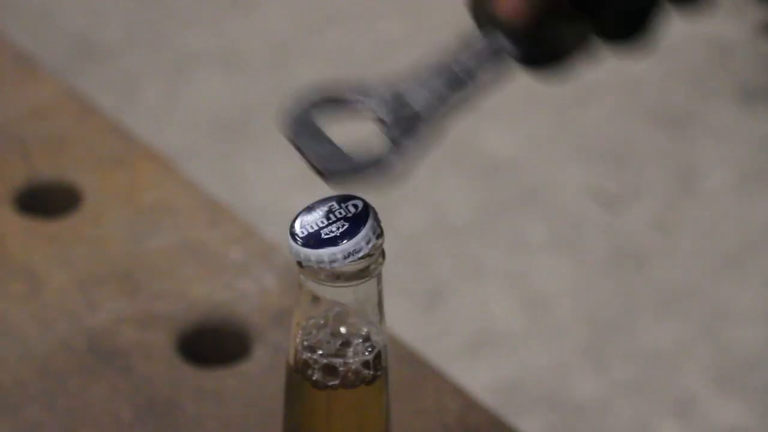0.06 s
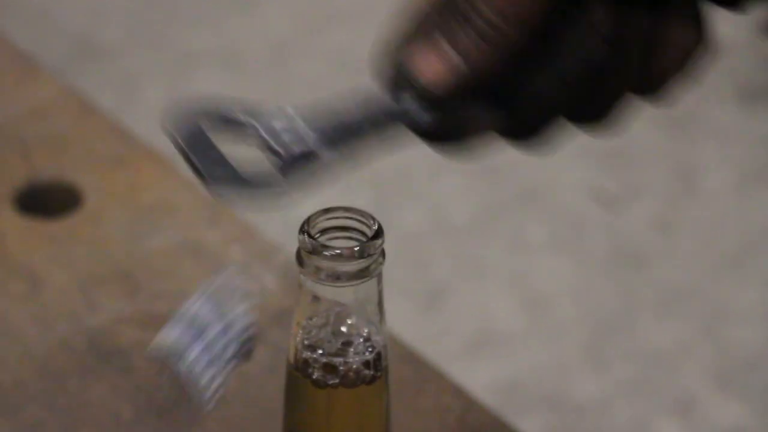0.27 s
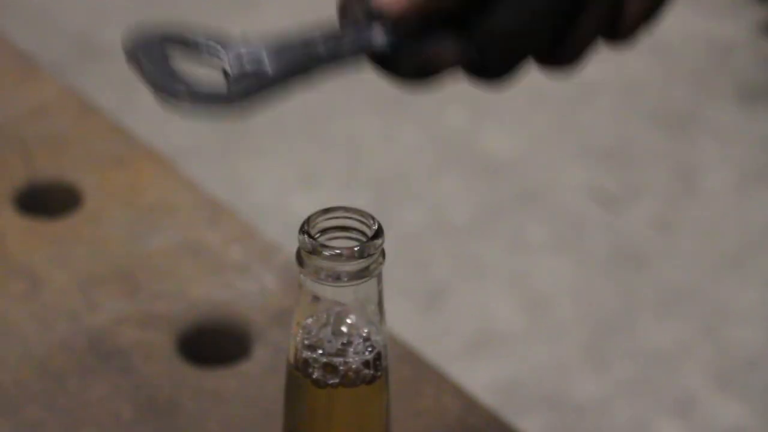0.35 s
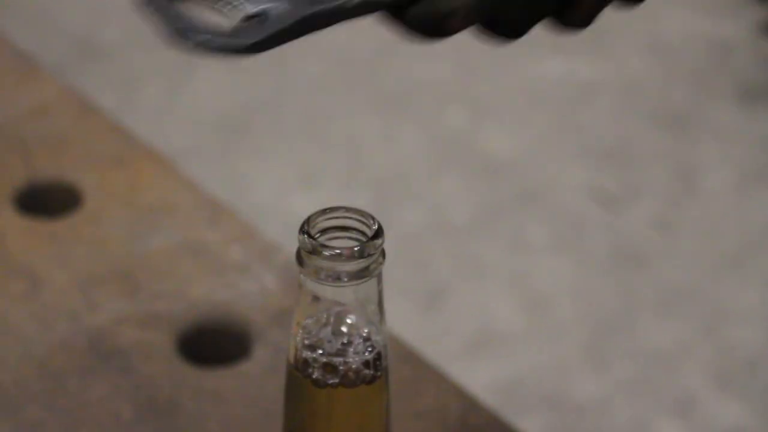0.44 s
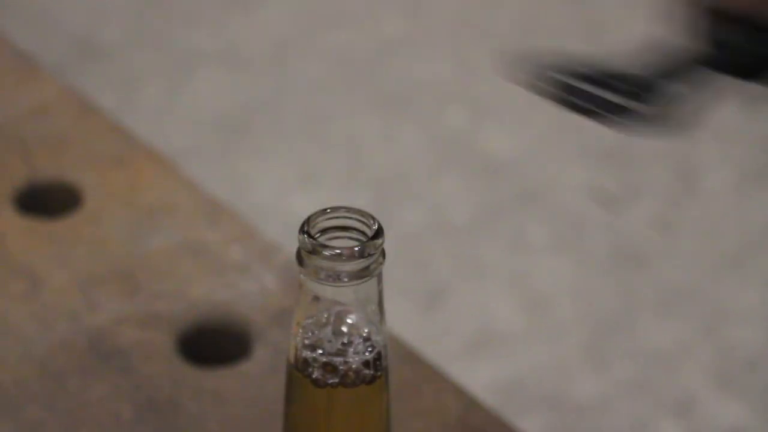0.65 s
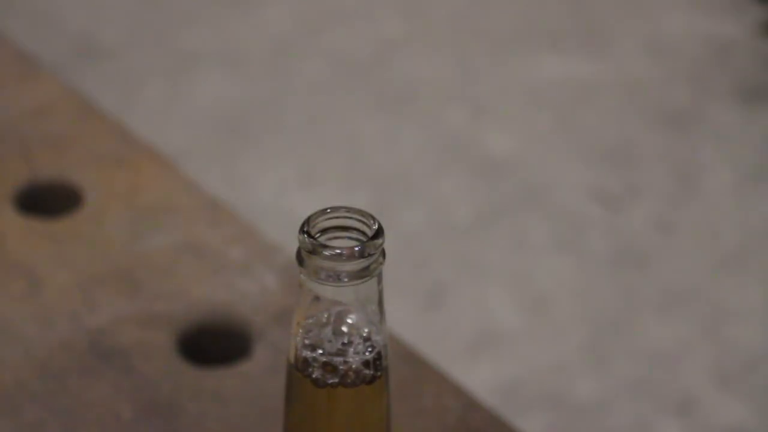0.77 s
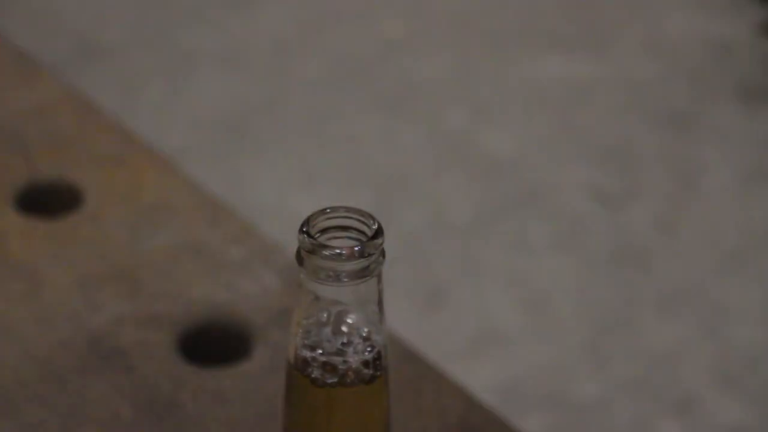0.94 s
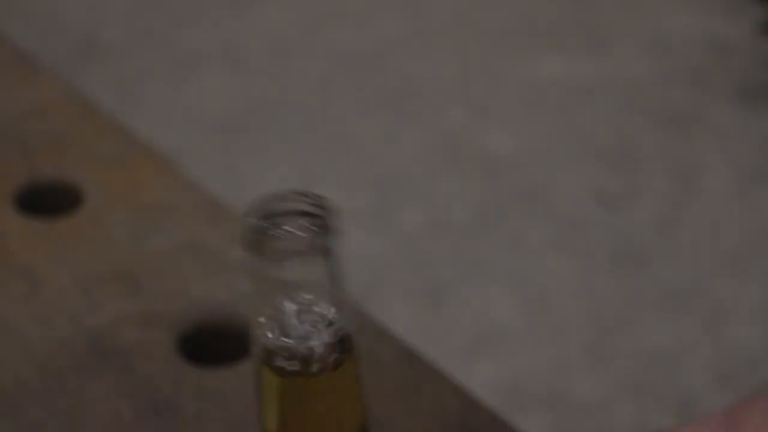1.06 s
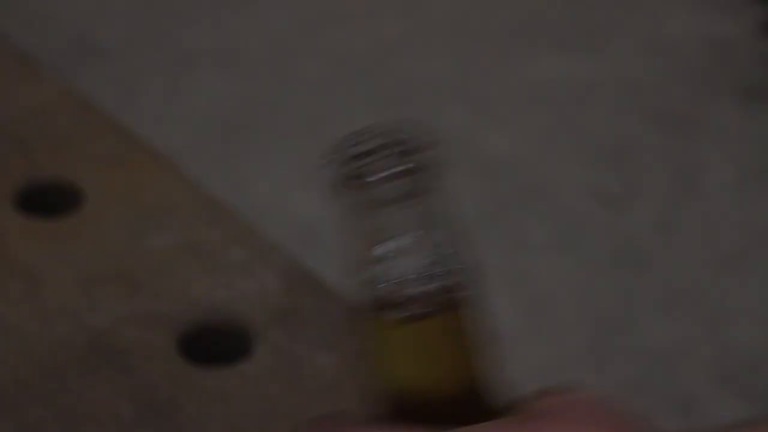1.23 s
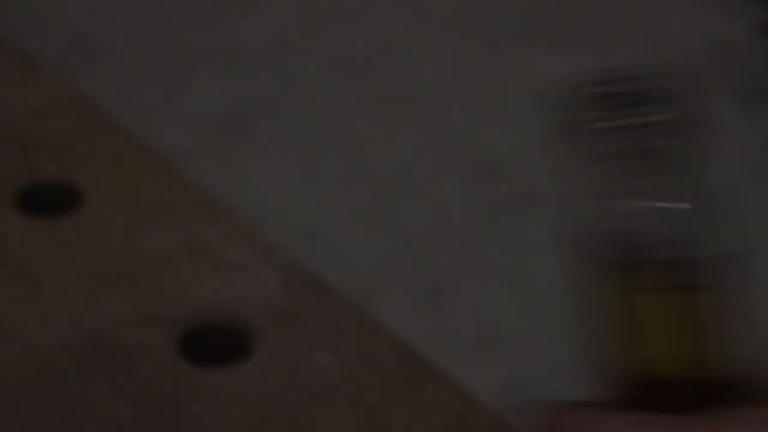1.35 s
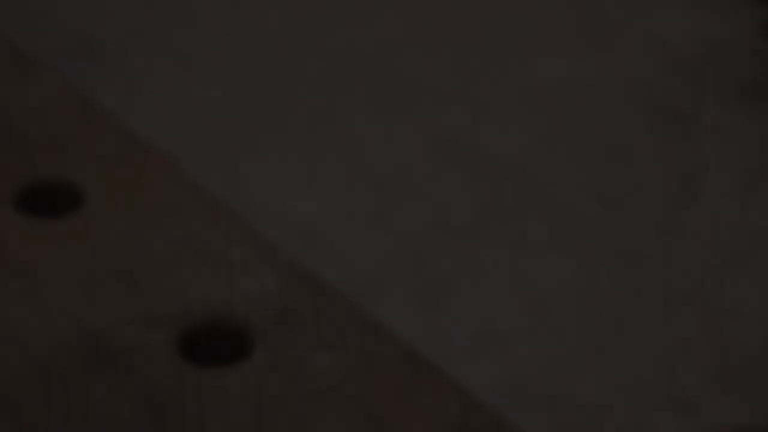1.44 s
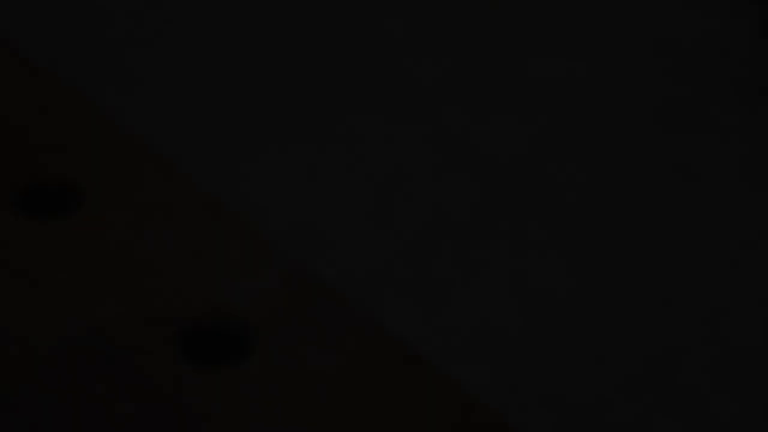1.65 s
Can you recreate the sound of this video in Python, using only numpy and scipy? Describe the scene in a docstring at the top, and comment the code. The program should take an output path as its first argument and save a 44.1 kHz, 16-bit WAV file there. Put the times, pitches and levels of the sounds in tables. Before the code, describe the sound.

A steel opener pops the cap off a glass bottle, clinking as gas spits. The cap strikes near the microphone with a bright ring and skitters off in light ticks, in a slightly echoing, humming workshop heard on the left.

```python
"""In a humming workshop, a steel opener levers the cap off a glass bottle: the seal cracks, gas spits,
the neck pops and the opener clinks. The cap lands hard close by, then bounces away over the floor,
and the drink sloshes. One microphone feeds the left channel; the right holds only hiss.
A limiter turns both down after the loud hits."""
import sys
import numpy as np
from scipy import signal
from scipy.fft import rfft, irfft
from scipy.io import wavfile
from scipy.ndimage import uniform_filter1d

SR = 44100
rng = np.random.default_rng(int(sys.argv[2]) if len(sys.argv) > 2 else 0)


def store_pcm(level_fs):
    """Save levels as 16-bit WAV."""
    pcm = np.round(np.clip(level_fs, -1, 1) * 32767).astype(np.int16)
    wavfile.write(sys.argv[1], SR, np.atleast_2d(pcm).T)


N = 74970
TIME = np.arange(N) / SR
FREQS = np.fft.rfftfreq(N, 1 / SR)


def amp(db):
    """Turns decibels into a gain."""
    return 10 ** (np.asarray(db) / 20)


def unit(x):
    """Scales a signal to an average power of one."""
    return x / np.sqrt(np.mean(x ** 2) + 1e-20)


def look_up(points, hz):
    """Reads between a table's rows on a pitch scale."""
    f, value = np.transpose(points)
    return np.interp(np.log(hz + 1), np.log(f + 1), value)


def noise(colour, peaks=()):
    """Steady noise; colour balances low against high, peaks add resonances."""
    db = look_up(colour, FREQS)
    db += sum(boost / (1 + (2 * (FREQS - hz) / width) ** 2) for hz, width, boost in peaks)
    return unit(irfft(rfft(rng.standard_normal(N)) * amp(db), N))


def wobble(hz):
    """A random wiggle, mostly slower than hz."""
    return unit(irfft(rfft(rng.standard_normal(N)) * np.exp(-FREQS / hz), N))


def decay(t, ring_s):
    """Falls by 60 dB in one ring time."""
    return np.exp(-np.log(1000) * t / ring_s)


def ring(tones, stretch=1, rise_s=0.00018):
    """The dying tones of a struck object; neighbours start in opposite directions."""
    t = TIME[:SR // 3]
    waves = sum((-1) ** k * amp(db) * decay(t, ring_s * stretch) * np.sin(2 * np.pi * hz * t)
                for k, (hz, db, ring_s) in enumerate(tones))
    return (1 - np.exp(-t / rise_s)) * waves


def tick(colour, ring_s, peaks=()):
    """Many short tones blur into a burst of noise."""
    t = TIME[:SR // 3]
    return noise(colour, peaks)[:len(t)] * decay(t, ring_s)


def place(start, sound, room_db):
    """Starts a sound on two tracks: one heard directly, one sent into the room."""
    track = np.pad(sound, (round(start * SR), N))[:N]
    return np.array([track, amp(room_db) * track])


# colour of the hiss (frequency [Hz], relative level [dB])
HISS_COLOUR = [(30, 16), (250, 3.5), (1000, 2), (4000, -1), (15500, -1)]
def hiss():
    """The preamplifier's own faint noise."""
    return amp(-53) * noise(HISS_COLOUR)


# colour of the moving air (frequency [Hz], relative level [dB])
AIR_COLOUR = [(25, -12), (48, -10), (72, -6.5), (150, -8), (350, 1.5), (700, -4), (1300, -5.5), (1900, -10),
              (3000, -9.5), (4000, -13.5), (4900, -10), (6500, -17), (9000, -26.5), (15500, -35.5)]
# the motor's tones (frequency [Hz], level [dB])
MOTOR_TONES = [(48.4, -46), (96, -52), (145, -39.5), (193, -42.5), (287, -45), (576, -44), (963, -45),
               (1152.4, -38), (1728.5, -43)]
def ventilation(waver=0.18):
    """Rushing air and a motor whose hum wavers."""
    hum = np.zeros(N)
    for hz, db in MOTOR_TONES:
        gain = amp(db) * np.sqrt(2) * (1 + waver * wobble(hz=8))
        phase = 2 * np.pi * (hz * TIME + rng.random()) + waver * wobble(hz=8)
        hum += gain * np.sin(phase)
    return amp(-29) * noise(AIR_COLOUR) + hum


# how long the room rings (frequency [Hz], ring time [s])
ROOM_RING = [(200, 1), (900, 0.79), (2900, 0.83), (4000, 0.78), (5600, 0.72), (7700, 0.54), (14000, 0.37)]
# colour of its echo (frequency [Hz], gain [dB])
ROOM_COLOUR = [(200, 4.5), (6000, -1.5), (7700, -2.5), (10000, -6.5), (15500, -3.5)]
def room_echo(sound, build_s=0.0028):
    """Reflections blend into a tail whose treble dies first."""
    hz, t, bands = signal.stft(rng.standard_normal(SR), SR, nperseg=256)
    bands *= decay(t, look_up(ROOM_RING, hz)[:, None])
    tail = signal.istft(bands, SR, nperseg=256)[1][:SR]
    tail *= 1 - np.exp(-(TIME[:SR] / build_s) ** 2)
    colour = amp(look_up(ROOM_COLOUR, np.fft.rfftfreq(SR, 1 / SR)))
    tail = irfft(rfft(tail / np.linalg.norm(tail)) * colour, SR)
    return signal.fftconvolve(sound, tail)[:N]


# each slosh (time [s], level [dB])
SLOSHES = [(1.591, -23.5), (1.668, -24.5)]
# their dull colour (frequency [Hz], relative level [dB])
SLOSH_COLOUR = [(100, -10), (350, 2), (850, -0.5), (1400, -16), (5000, -35), (15000, -65)]
def drink(swell_s=0.006):
    """The drink sloshes as the bottle is lifted."""
    swell = TIME / swell_s * np.exp(1 - TIME / swell_s)
    return sum(place(start, amp(db) * noise(SLOSH_COLOUR) * swell, room_db=-16.5)
               for start, db in SLOSHES)


# each pop (time [s], frequency [Hz], level [dB], ring time [s])
NECK_POPS = [(.2092, 710, -11.5, 0.14), (0.232, 1405, -5.5, 0.036), (.2660, 770, -8.5, 0.044),
             (.2700, 831, 1, 0.069), (.2765, 845.7, 14, 0.078), (.2800, 896, 4, 0.13),
             (1.1146, 1044, -9.5, 0.036), (1.1220, 962, -12.5, 0.1)]
def neck():
    """The air in the neck rings, popped by the cap and later by bursting foam."""
    return sum(place(start, ring([tone], rise_s=0.0012), room_db=-16.5) for start, *tone in NECK_POPS)


# strength of the leak (time [s], level [dB])
GAS_FLOW = [(.208, -41), (.210, -15), (.218, -17), (.221, -5), (.233, -11), (.243, -8.5), (.247, -28),
            (.262, -39), (.269, -11), (.275, -7.5), (.283, 2)]
# its colour (frequency [Hz], relative level [dB])
GAS_COLOUR = [(300, -49), (750, -5), (1400, -2.5), (2000, -19), (3000, 1.5), (4000, -1), (5500, -5),
              (7800, -10), (8600, -18), (11000, -6), (12600, -17), (15500, -26)]
# whistles of the gap under the cap (frequency [Hz], width [Hz], boost [dB])
GAP_WHISTLES = [(766, 33, 22), (3020, 220, -1.5), (3920, 150, 9), (8140, 260, 12), (9400, 540, 7.5),
                (11400, 700, 1.5)]
def gas():
    """Gas spits unevenly through the broken seal."""
    flow_db = np.interp(TIME, *np.transpose(GAS_FLOW), left=-120, right=-120)
    sputter_db = 2.5 * np.minimum(wobble(hz=1695), 1)
    return place(0, noise(GAS_COLOUR, GAP_WHISTLES) * amp(flow_db + sputter_db), room_db=-12.5)


# each clink (time [s], ring gain [dB], crack level [dB], ring time stretch [x])
CLINKS = [(.2086, 5.5, -0.5, 0.1), (.2702, 3.5, 4, 0.65), (0.2756, 18, 9.5, 1)]
# steel and glass ringing together (frequency [Hz], relative level [dB], base ring time [s])
CLINK_TONES = [(1419, -16.5, 0.041), (2023, -12, 0.016), (2760, -0.5, 0.011), (2825, -3, 0.025),
               (3023, -5.5, 0.036), (3570, -24, 0.027), (4900, -14, 0.0067), (5259, -10.5, 0.058),
               (5880, -12, 0.087), (5997, -12.5, 0.042)]
# colour of the crack (frequency [Hz], relative level [dB])
CRACK_COLOUR = [(300, -7), (1200, -29), (2000, -3.5), (3000, 12.5), (4800, 7.5), (7000, -4.5), (8600, 0),
                (9600, -2.5), (12000, -25), (15500, -38)]
# its resonances (frequency [Hz], width [Hz], boost [dB])
CRACK_PEAKS = [(2950, 700, 9), (9500, 750, 7)]
def opener():
    """Steel slips off the glass rim and clinks, muffled by the hand."""
    out = np.zeros((2, N))
    tones = CLINK_TONES + [(hz, -24, 0.04) for hz in (10050, 13400)]
    for start, ring_db, crack_db, stretch in CLINKS:
        crack = amp(crack_db) * tick(CRACK_COLOUR, ring_s=0.019, peaks=CRACK_PEAKS)
        out += place(start, amp(ring_db) * ring(tones, stretch) + crack, room_db=-9)
    return out


# the cap's hits, the soft echo or wobble after some bounces, and a small tick of fizz at 0.683 s
# (time [s], main gain [dB], low gain [dB], high gain [dB], tick level [dB], ring time stretch [x],
# room gain [dB])
CAP_SOUNDS = [(.2087, -6, -24, -17, -15, 0.54, -10), (.2200, 1.5, -30, -11, -24, 0.36, -27),
              (0.2703, -2, -7, -8.5, -1, 0.5, -5), (.5023, 28, -22, -22, 9.5, 0.77, -9),
              (.5060, 28, -15, -28, 14, 0.68, -12.5), (0.683, -23, -49, -31, -18.5, 0.76, -12.5),
              (0.919, -5.5, -26, -40, -30.5, 0.41, -3), (.9320, -5.5, -30, -19, -6.5, 0.47, -10.5),
              (.9357, -5.5, -45.5, -30, -9, 1, -12), (.9385, -11, -56, -47, -33, 2.43, -5),
              (0.9449, -17, -50, -40, -19, 1.23, -15), (1.0836, -5, -23.5, -28.5, -8, 0.34, -9),
              (1.0890, -20.5, -40, -34, -28, 0.74, 4.5), (1.0968, -11.5, -32, -31, -49, 0.99, -15),
              (1.1977, -9, -26, -25, -15.5, 0.49, -1.5), (1.2947, -15.5, -23, -7.5, -8, 0.54, -9.5),
              (1.299, -21, -46, -31, -19, 0.27, -11), (1.31, -20, -38, -37, -66, 1.3, 1),
              (1.3762, -15, -14, -6.5, -8.5, 0.64, -9.5), (1.3998, -17.5, -45, -20.5, -14, 0.62, 0),
              (1.4270, -5, -20.5, -11, -19, 0.47, -17), (1.4372, -43, -36, -17, -14, 0.55, -23),
              (1.4580, -16.5, -18.5, -27, -42, 0.81, -33), (1.483, -14.5, -42, -28, -46, 0.61, -18)]
# the cap's four groups of tones (frequency [Hz], relative level [dB], base ring time [s])
CAP_MAIN = [(3798, -7, .05), (3877, -1.5, 0.071), (3920, 1.5, 0.075), (4057, -21.5, 0.069),
            (4292, -16.5, 0.14)]
CAP_LOW = [(1877, 0, 0.21)]
CAP_HIGH = [(6310, 1.5, 0.027), (6410, 0, 0.092), (10810, -6, 0.057), (15050, -23, 0.054)]
CAP_OCTAVE = [(7665, -13.5, 0.07)]
# colour of the tick (frequency [Hz], relative level [dB])
TICK_COLOUR = [(300, -45), (2500, -28), (3800, 5.5), (5200, 1.5), (7400, 2), (8800, -10), (11000, 1),
               (15500, -34)]
# thud under the first landing (frequency [Hz], level [dB], ring time [s])
THUD = [(70, -7, 0.033)]
def cap():
    """The cap rings with a changing mix of tones; a soft echo or wobble follows some bounces."""
    out = place(0.5023, ring(THUD), room_db=-22)
    overtones = ring(CAP_OCTAVE + [(hz, -28, 0.04) for hz in (13020, 14560)])
    for start, main_db, low_db, high_db, tick_db, stretch, room_db in CAP_SOUNDS:
        sound = amp(main_db) * ring(CAP_MAIN, stretch)
        sound += amp(low_db) * ring(CAP_LOW, stretch)
        sound += amp(high_db) * ring(CAP_HIGH, stretch)
        sound += amp(tick_db) * tick(TICK_COLOUR, ring_s=0.016)
        sound += amp(min(main_db, tick_db + 20)) * overtones  # strong only on a hard contact
        out += place(start, sound, room_db)
    return out


def scene():
    """The microphone on the left, hiss alone on the right."""
    direct, to_room = cap() + opener() + gas() + neck() + drink()
    return np.array([direct + room_echo(to_room) + ventilation(), hiss()])


def hold(db, fall_db_per_s):
    """Holds each peak and lets it sink; a negative fall makes it climb."""
    ramp = fall_db_per_s * TIME
    return np.maximum.accumulate(db + ramp) - ramp


def limiter(sound, threshold_db=-3.5, attack_s=0.0013):
    """Turns both channels down just after a loud hit, then mostly back up."""
    peak_db = 20 * np.log10(abs(sound).max(0) + 1e-9)
    cut_db = 1.121 * np.maximum(peak_db - threshold_db, 0)
    lingering_db = 0.12 * hold(cut_db, -0.7)  # a small part stays and slowly deepens
    duck_db = np.maximum(hold(cut_db, 142.5), lingering_db)
    lag = np.exp(-1 / (attack_s * SR))
    smooth_db = signal.lfilter([(1 - lag) ** 2], [1, -2 * lag, lag * lag], duck_db)
    return sound * amp(-smooth_db)


# the closing fade (time [s], gain [dB])
FADE = [(1.28, -1), (1.45, -4.5), (1.6, -6.5), (1.7, -11)]
def record(dry):
    """Peaks that outrun the limiter clip lopsidedly; the end fades and the top treble is cut."""
    limited = limiter(dry)
    skew = 0.04 * uniform_filter1d(np.maximum(abs(limited) - 1, 0), size=40, axis=1)
    clipped = np.clip(limited + skew, -1, 1)
    fade = amp(np.interp(TIME, *np.transpose(FADE)))
    low_pass = signal.firwin(401, 15800, window=("kaiser", 8), fs=SR)
    return signal.oaconvolve(clipped * fade, low_pass[None], "same")


dry = scene()
out = record(dry)
store_pcm(out)
```